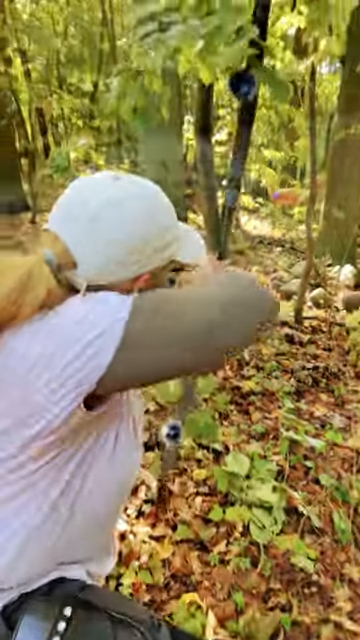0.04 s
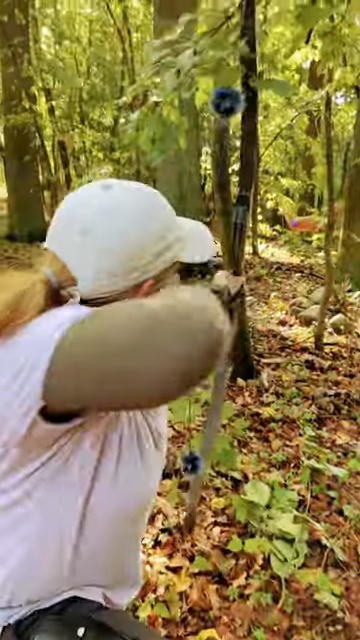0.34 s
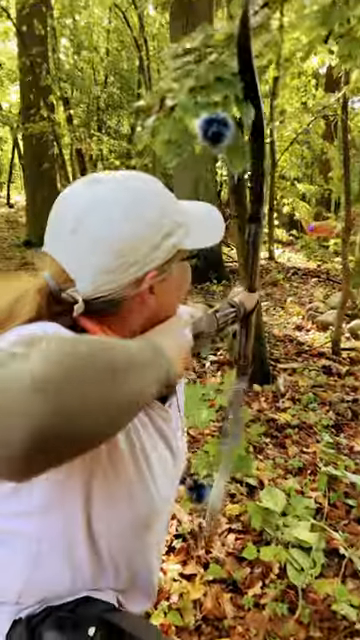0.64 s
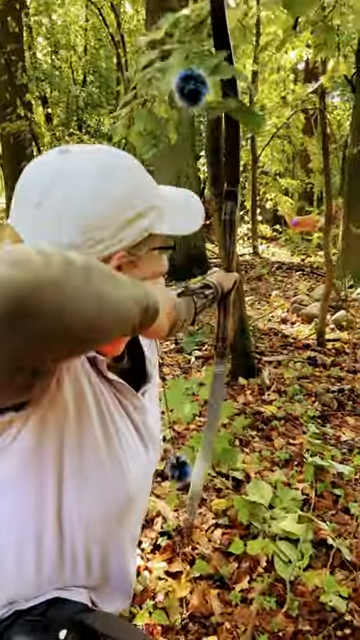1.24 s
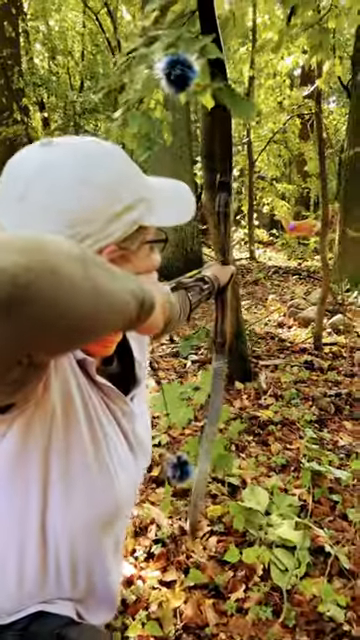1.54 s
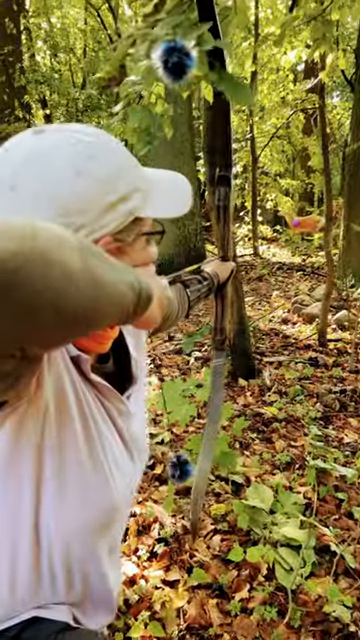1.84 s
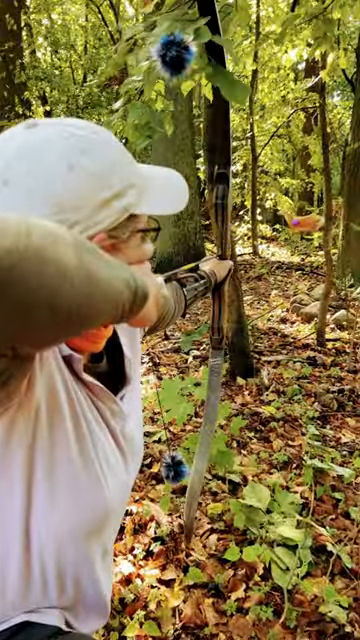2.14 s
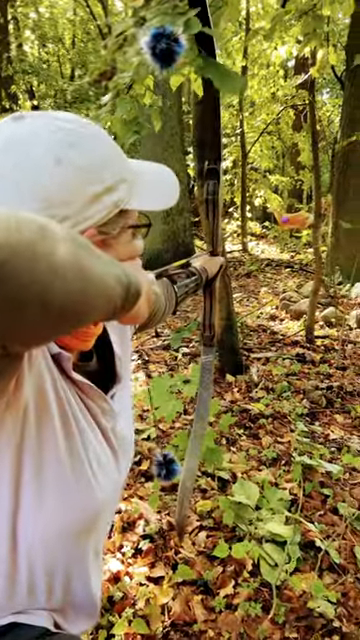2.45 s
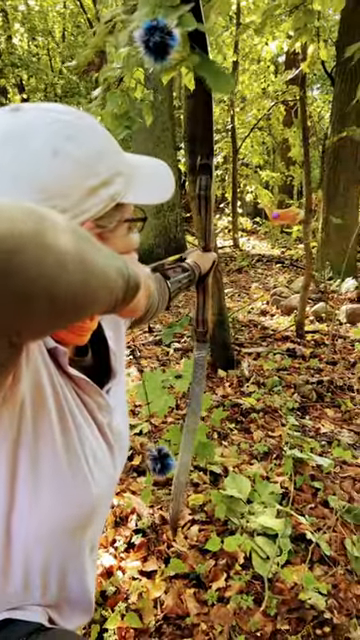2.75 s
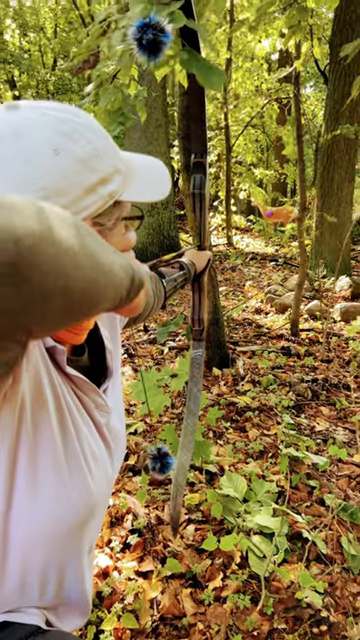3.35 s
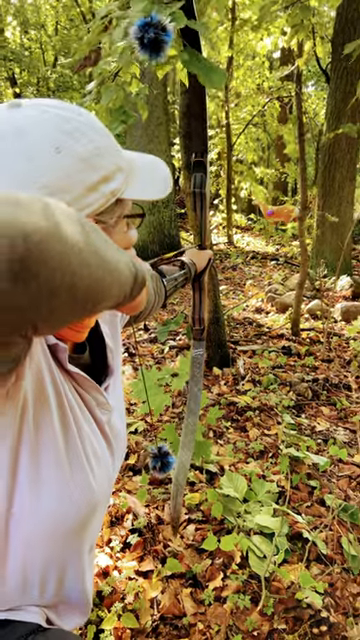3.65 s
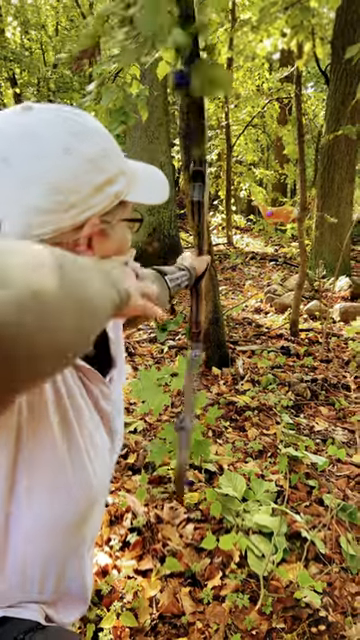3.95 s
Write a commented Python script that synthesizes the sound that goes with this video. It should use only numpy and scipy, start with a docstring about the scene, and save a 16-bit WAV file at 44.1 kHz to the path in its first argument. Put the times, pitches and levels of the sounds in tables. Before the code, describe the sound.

A bow fires with a sharp snap and low twang after a quiet forest pause.

```python
"""An archer draws a bow in a quiet forest and shoots. Leaves hiss throughout. First clothes rustle,
the gear ticks and movement makes soft bumps. The arrow rubs back over its rest while a far bird
whistles four times among echoing trees. The archer holds still. Near the end the string pops off the
fingers, the arrow scrapes, slaps and knocks its way past the shaking bow, and the string snaps tight
with a thump and a low twang."""
import sys
import numpy as np
from scipy import signal
from scipy.fft import rfft, irfft
from scipy.io import wavfile

SR = 44100
rng = np.random.default_rng(int(sys.argv[2]) if len(sys.argv) > 2 else 0)


def transcribe(signal):
    """Save signal, clipped to [-1, 1], as a 16-bit WAV file at the path in sys.argv[1]."""
    frames = np.atleast_2d(signal).T
    limited = np.clip(frames, -1, 1)
    pcm = np.round(limited * 32767).astype(np.int16)
    wavfile.write(sys.argv[1], SR, pcm)


N = 176400
T = np.arange(N) / SR
FREQS = np.fft.rfftfreq(N, 1 / SR)


def amp(db):
    """Turns decibels into a number to multiply by."""
    return 10 ** (np.asarray(db) / 20)


def evened(x):
    """Scales a sound to an average strength (rms) of 1."""
    return x / np.sqrt(np.mean(x ** 2) + 1e-20)


def look_up(points, hz):
    """Reads between a table's rows, giving every octave equal room."""
    f, value = np.transpose(points)
    return np.interp(np.log(hz + 1), np.log(f + 1), value)


def envelope(start, rise, fade, hold=0):
    """Rises, holds, dies away. A fade time is always the seconds taken to drop 60 dB."""
    age = T - start
    return np.clip(age / rise, 0, 1) * np.exp(-np.log(1000) * np.maximum(age - hold, 0) / fade)


def noise(gains):
    """Noise with a chosen strength at each frequency."""
    return evened(irfft(rfft(rng.standard_normal(N)) * gains, N))


def drift(rate_hz):
    """A smooth random wobble."""
    return noise(np.exp(-(FREQS / rate_hz) ** 2))


def bell(hz, octaves):
    """A bell-shaped curve that favours the frequencies around one pitch."""
    distance = np.log2((FREQS + 1) / hz) / octaves
    return np.exp(-distance ** 2 / 2)


def grains(per_s, spread_db):
    """Rubbing: tiny slips of random direction, size and time."""
    slips = rng.choice([-1, 1], N) * amp(spread_db * rng.standard_normal(N))
    return evened(slips * (rng.random(N) < per_s / SR))


# tone of the leaves and air: f/Hz, level/dB
LEAF_TONE = [(15, -55), (25, -25), (48, -3.5), (80, 0.5), (119, -4), (485, -6.5), (618, -10.5),
             (787, -10.5), (853, -11), (1390, -13.5), (4300, -14.5), (6800, -20), (10500, -35),
             (14100, -41), (15700, -44)]
def leaves():
    """Leaves and distant air hiss steadily, barely swelling."""
    return noise(amp(look_up(LEAF_TONE, FREQS))) * amp(-65 + 0.31 * drift(rate_hz=2))


# tone of the cloth: f/Hz, level/dB
CLOTH_TONE = [(100, -8), (500, 1.5), (1000, -1), (2000, -6), (5500, -5.5), (9000, -17), (14500, -36)]
# loudness of the rustle: t/s, level/dB
CLOTH_LOUDNESS = [(0, -68), (.3, -68), (.65, -73), (1.0, -71), (1.45, -74), (1.8, -76.5), (2.1, -78),
                  (4, -86)]
def clothes():
    """Clothes rustle unevenly during the draw, then settle."""
    db = np.interp(T, *np.transpose(CLOTH_LOUDNESS)) + 1.8 * drift(rate_hz=20)
    return noise(amp(look_up(CLOTH_TONE, FREQS))) * amp(db)


# loudness of the fizz: t/s, level/dB
FIZZ_LOUDNESS = [(0, -73), (.08, -85), (.25, -77.5), (.45, -80), (.68, -87), (1.3, -103), (1.46, -83),
                 (1.6, -89), (1.76, -80), (1.92, -92), (4, -110)]
def sleeve_fizz():
    """Tiny slips of sleeve and string make a fine, high fizz."""
    slips = grains(per_s=2500, spread_db=4.5)
    fizz = evened(irfft(rfft(slips) * bell(hz=8900, octaves=0.35), N))
    return fizz * amp(np.interp(T, *np.transpose(FIZZ_LOUDNESS)) + 2.6 * drift(rate_hz=60))


# ticks and creaks: t/s, level/dB, f/Hz, width/octaves, fade/s
GEAR_TICKS = [(0.2092, -52.5, 600, 0.9, 0.035), (.209, -59, 8500, .25, .012),
              (.447, -61.5, 10000, .35, 0.018), (.644, -60.5, 750, 0.45, 0.056),
              (0.7052, -49.5, 590, 0.36, 0.03), (.999, -58, 1700, 0.37, 0.11),
              (1.4122, -52, 2450, 0.33, 0.01), (1.4124, -46, 5900, 0.48, 0.0096),
              (1.433, -56, 12500, 0.33, .01), (1.53, -61, 450, 0.89, .03), (1.726, -64, 4400, .17, .025),
              (2.133, -58.5, 8500, 0.5, 0.013)]
def gear_ticks():
    """The gear ticks: each time a tiny pitched knock and a burst of noise."""
    out = np.zeros(N)
    for s, db, hz, octaves, fade in GEAR_TICKS:
        knock = envelope(s, rise=0.5 / hz, fade=6 / (hz * octaves)) * np.sin(2 * np.pi * hz * (T - s))
        burst = envelope(s, rise=0.0005, fade=fade) * noise(bell(hz, octaves))
        out += amp(db) * (knock + burst)
    return out


# soft bumps: t/s, length/s, level/dB
MOVEMENT_BUMPS = [(.245, .07, -61), (.425, 0.063, -61), (0.528, 0.057, -65.5), (0.683, 0.066, -65),
                  (0.805, 0.11, -66.5), (1.008, 0.056, -67), (1.096, .045, -60.5), (1.15, 0.098, -67)]
def bumps():
    """The archer's movements make short swells of low rumble."""
    out, rumble = np.zeros(N), noise(bell(hz=72.7, octaves=0.44))
    for s, length, db in MOVEMENT_BUMPS:
        swell = rumble * np.sin(np.pi * np.clip((T - s) / length, 0, 1))
        out += amp(db) * evened(swell) * np.sqrt(length * SR / N)
    return out


def resonate(x, hz, width):
    """Makes a sound ring around a moving pitch."""
    turn = np.exp(2j * np.pi * np.cumsum(hz) / SR)
    decay = np.exp(-np.pi * width / SR)
    ring = signal.lfilter([1], [1, -2 * decay, decay ** 2], x / turn)
    return evened((turn * ring).real)


# the arrow's slide: t/s, level/dB, main f/Hz
SLIDE_PATH = [(.62, -95, 1130), (.72, -75, 1150), (.83, -73, 1170), (.9, -66, 1205), (1.08, -67.5, 1215),
              (1.3, -71, 1195), (1.55, -73, 1200), (1.6, -95, 1150)]
# its ringing notes: share of the main pitch, width/Hz, level/dB
SLIDE_NOTES = [(.33, 190, -2), (.65, 210, -3), (.81, 220, -2.5), (1.0, 200, 0)]
def arrow_on_rest():
    """The arrow rubs back over the ledge it rests on, ringing at a gently shifting pitch."""
    times, levels, pitches = np.transpose(SLIDE_PATH)
    slips, pitch = grains(per_s=1500, spread_db=4), np.interp(T, times, pitches)
    ring = sum(amp(db) * resonate(slips, share * pitch, width) for share, width, db in SLIDE_NOTES)
    return evened(ring) * amp(np.interp(T, times, levels)) * (T > times[0]) * (T < times[-1])


# whistles: t/s, length/s, start f/Hz, end f/Hz, level/dB
BIRD_WHISTLES = [(0.725, 0.27, 4680, 3850, -68), (1.16, .18, 4170, 4230, -68), (1.5, .17, 4230, 4200, -69),
                 (2.405, .26, 4620, 3950, -70.5)]
def bird():
    """A far bird's thin whistles, falling or nearly level, come mostly by way of the trees."""
    out, waver = np.zeros(N), 1 + 0.009 * drift(rate_hz=62)
    for s, length, start_hz, end_hz, db in BIRD_WHISTLES:
        progress = np.clip((T - s) / length, 0, 1)
        hz = (end_hz + (start_hz - end_hz) * (1 - progress) ** 1.5) * waver  # the glide flattens out
        loudness = amp(db - 6 * progress) * np.sqrt(abs(np.sin(np.pi * progress)))
        out += loudness * np.sin(2 * np.pi * np.cumsum(hz) / SR)
    return amp(-1) * out + tree_echo(out)


# how long the echo lasts: f/Hz, fade/s
ECHO_FADES = [(100, .2), (1200, 0.24), (2500, 0.41), (6000, 0.42), (15000, 0.51)]
def tree_echo(x, per_s=3000, spread_db=2.5, delay_s=0.014):
    """Trunks and leaves send back many faint echoes; the low notes die first."""
    echoes = rng.standard_normal(SR) * amp(spread_db * rng.standard_normal(SR))
    echoes *= (rng.random(SR) < per_s / SR) * (T[:SR] > delay_s)
    hz, t, bands = signal.stft(echoes, SR, nperseg=256)
    fading = np.exp(-np.log(1000) * t / look_up(ECHO_FADES, hz)[:, None])
    tail = signal.istft(bands * fading, SR, nperseg=256)[1]
    return signal.fftconvolve(x, tail / np.linalg.norm(tail))[:N]


# overall tone of arrow on bow: f/Hz, level/dB
SHAFT_TONE = [(100, -25), (300, -15), (450, -7), (850, -10), (1150, -5.5), (1280, -12.5), (1450, -4),
              (2700, -3.5), (4200, -7), (6500, -3.5), (7900, -8.5), (9500, -9), (11500, -12.5),
              (15500, -17)]
# notes that stand out above it: f/Hz, width/Hz, level/dB
SHAFT_NOTES = [(690, 70, 6), (755, 51, 7), (988, 52, 8.5), (1032, 56, 8.5), (1093, 50, 5), (1390, 75, 9.5),
               (1440, 100, 5.5), (1660, 57, -0.5), (2030, 39, 0.5), (2530, 59, 5), (3430, 110, 6.5),
               (4000, 38, 6.5), (4500, 30, 8), (4884, 76, 6), (5700, 60, 6), (6370, 30, 4), (6700, 50, 6),
               (7060, 90, 4), (7680, 22, 3), (9600, 30, 8.5)]
def ring_shaft(force, size=8192):
    """Each push sets the arrow's shaft and the bow ringing."""
    hz = abs(np.fft.fftfreq(size, 1 / SR))
    peaks = 1 + sum(amp(db) ** 2 / (1 + (2 * (hz - f) / width) ** 2) for f, width, db in SHAFT_NOTES)
    log_gain = np.log(amp(look_up(SHAFT_TONE, hz)) * np.sqrt(peaks))
    spectrum = np.exp(np.conj(signal.hilbert(log_gain)))  # rings after a push, never before
    ring = np.fft.ifft(spectrum).real[:size // 2]
    return signal.fftconvolve(force, ring / np.linalg.norm(ring))[:N]


SLIP_S, LAUNCH_S, TIGHT_S = 3.8818, 3.889, 3.8973  # string slips, arrow sets off, string snaps tight

# notes of the pop: f/Hz, level/dB
POP_NOTES = [(420, -34), (730, -24.5), (1060, -35.5)]
def fingers(hiss_s=0.017, pop_s=0.009):
    """The string hisses over the finger guard and leaves it with a hollow pop."""
    swell = np.clip(1 + (T - LAUNCH_S) / hiss_s, 0, 1) ** 2 * (T < LAUNCH_S + 0.002)
    hiss = amp(-29) * ring_shaft(swell * rng.standard_normal(N))
    age = np.clip(T - SLIP_S, 0, pop_s)
    notes = sum(amp(db) * np.sin(2 * np.pi * hz * age) for hz, db in POP_NOTES)
    return hiss + np.sin(np.pi * age / pop_s) * notes


# slaps on the bow: t/s, level/dB, f/Hz above which the slap is dulled
ARROW_SLAPS = [(3.8896, -19, 12000), (3.8949, -19, 6000), (3.8991, -16.5, 14000), (3.902, -11, 2800),
               (3.9085, -20, 6000), (3.9124, -18, 1200), (3.9168, -17, 10000), (3.922, -19, 900),
               (3.931, -31, 5000), (3.974, -46, 9000), (3.984, -39, 12000), (3.997, -42, 6000)]
def arrow_on_bow():
    """The arrow scrapes past the bow and rattles against it with hard and dull slaps."""
    scrape = envelope(LAUNCH_S, rise=0.002, hold=0.015, fade=0.097)
    force = amp(-21) * scrape * grains(per_s=9000, spread_db=4.5)
    for s, db, top_hz in ARROW_SLAPS:
        slap = amp(db) * envelope(s, rise=0.0005, fade=0.015) * rng.standard_normal(N)
        softness = np.exp(-2 * np.pi * top_hz / SR)
        force += signal.lfilter([1 - softness], [1, -softness], slap)
    return ring_shaft(force)


def bow_shudder():
    """The bow shakes with a low, rough sound as the arrow sets off."""
    return amp(-34) * envelope(LAUNCH_S, rise=0.0088, fade=0.25) * noise(bell(hz=240, octaves=0.73))


# knocks on the grip: t/s, level/dB, contact/s
GRIP_KNOCKS = [(3.8942, -8, .0004), (3.9018, 0, .00015), (3.9062, -10, .0004), (3.9168, -9, .0001)]
# notes of the wood: f/Hz, level/dB, fade/s
GRIP_NOTES = [(668, -31, .05), (1034, -28.5, .055), (1400, -22, .05), (1560, -21, .022), (1906, -27, .04),
              (2035, -26, .04), (2490, -22.5, .045), (2780, -20.5, .02)]
def arrow_on_grip():
    """The arrow knocks on the wooden grip; a shorter contact rings the high notes more."""
    out = np.zeros(N)
    for s, knock_db, contact_s in GRIP_KNOCKS:
        for hz, note_db, fade in GRIP_NOTES:
            strength = amp(knock_db + note_db) / np.hypot(1, hz * contact_s)
            out += strength * envelope(s, contact_s, fade) * np.sin(2 * np.pi * hz * (T - s))
    return out


# notes of the string and the bow's arms: f/Hz, level/dB, fade/s
TWANG_NOTES = [(71.4, -21.5, 0.13), (91.7, -27.5, 0.87), (135.7, -26.5, 0.39), (182, -30, 0.47),
               (255, -32, .14), (389, -14.5, 0.16), (436, -27.5, 0.11)]
def bowstring(thump_hz=162, drop_hz=69.6, drop_s=0.0055):
    """The string snaps tight: the bow's arms thump, sinking in pitch, and ring on with the string."""
    age = np.maximum(T - TIGHT_S, 0)
    cycles = thump_hz * age + drop_hz * drop_s * (1 - np.exp(-age / drop_s))
    thump = envelope(TIGHT_S, rise=0.0082, hold=0.0082, fade=0.027) * np.sin(2 * np.pi * cycles)
    twang = sum(amp(db) * envelope(TIGHT_S, rise=0.0088, fade=fade) * np.cos(2 * np.pi * hz * age)
                for hz, db, fade in TWANG_NOTES)
    return amp(-13.5) * thump + twang


def scene():
    """The archer close by, the forest all round."""
    draw = clothes() + sleeve_fizz() + gear_ticks() + bumps() + arrow_on_rest()
    shot = fingers() + arrow_on_bow() + arrow_on_grip()
    echo = amp(-15) * tree_echo(draw + shot)
    return (leaves() + draw + bird() + shot + echo + bow_shudder() + bowstring())[None]


def record(dry, low_cut_hz=47, ceiling_db=-4, top_hz=15750):
    """The microphone drops the deepest rumble, rounds off loud peaks and cuts the highest treble."""
    hz = np.fft.rfftfreq(2 * N, 1 / SR)
    lean = irfft(rfft(dry, 2 * N) / np.sqrt(1 + (low_cut_hz / (hz + 1)) ** 10), 2 * N)[:, :N]
    rounded = lean / (1 + (lean / amp(ceiling_db)) ** 4) ** (1 / 4)
    treble_cut = signal.firwin(511, top_hz, window=("kaiser", 9), fs=SR)
    return signal.oaconvolve(rounded, treble_cut[None], "same")


dry = scene()
out = record(dry)
transcribe(out)
```